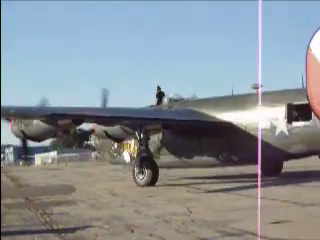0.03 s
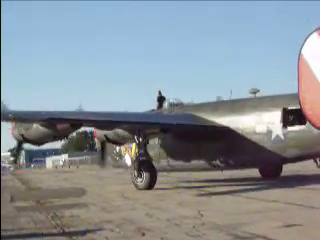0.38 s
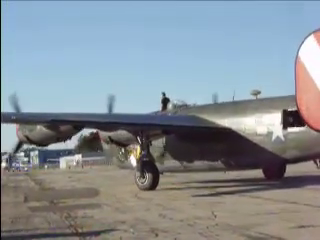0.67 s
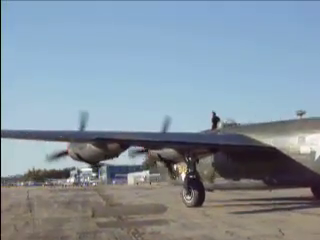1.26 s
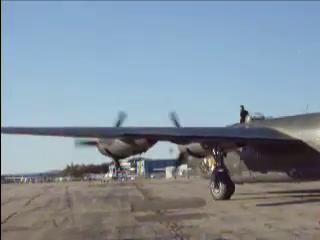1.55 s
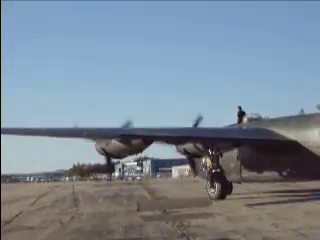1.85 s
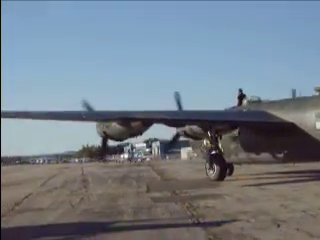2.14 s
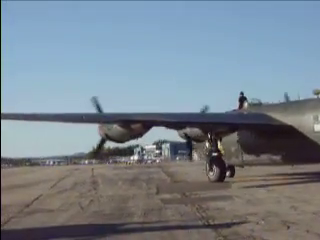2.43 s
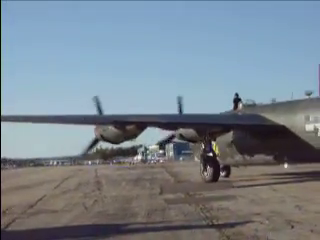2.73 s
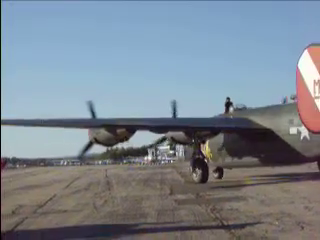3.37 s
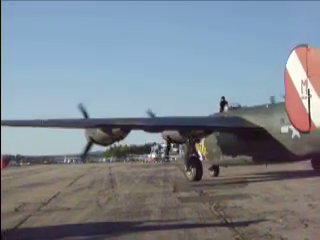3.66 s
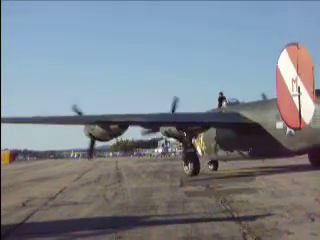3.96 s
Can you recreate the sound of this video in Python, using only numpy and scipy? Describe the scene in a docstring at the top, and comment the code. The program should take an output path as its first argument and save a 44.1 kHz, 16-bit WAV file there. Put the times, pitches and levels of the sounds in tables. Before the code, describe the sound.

Propeller aircraft engines idling with a steady, low, throbbing drone as it taxis.

```python
"""Radial-engined aircraft taxiing

A large piston aircraft taxis slowly away across an open apron. Three radial engines idle at slightly
different speeds, so their exhaust notes beat and throb. Each firing gives an exhaust pop and a burst
of valve clatter; the propellers chop turbulent air. The brakes squeak faintly four times, and the
recorder adds a thin whine."""
import sys
import numpy as np
from scipy import signal
from scipy.fft import rfft, irfft
from scipy.io import wavfile

SR = 44100
rng = np.random.default_rng(int(sys.argv[2]) if len(sys.argv) > 2 else 0)


def to_wav(s):
    """Save 16-bit WAV."""
    ch = np.atleast_2d(s).T  # columns
    pcm = np.round(np.clip(ch, -1, 1) * 32767)  # PCM
    wavfile.write(sys.argv[1], SR, pcm.astype(np.int16))


N = 176400
T = np.arange(N) / SR

# Crankshaft speed of the lead (loudest) engine. Each row: time in seconds, turns per second.
LEAD_SPEED_HZ = [(0, 10.2), (2.5, 10.19), (3.0, 10.09), (3.5, 9.94), (4, 9.87)]
# Lead engine's drone and the next order up. Each row: time in seconds, level in dB.
DRONE_DB = [(0, -25.5), (.65, -29), (1.1, -23.5), (1.55, -25.5), (2.1, -23.5), (3.2, -26.5), (4, -30.5)]
DRONE_ABOVE_DB = [(0, -29), (.7, -32), (1.55, -46), (2.1, -34), (2.5, -38.5), (3.0, -33.5), (3.4, -35),
                  (4, -40)]
# Exhaust tones per engine, swelling and fading as the aircraft turns, then gear tones.
# Each entry: crankshaft order, then peak level in dB, peak time in seconds, fall either side in dB/s.
LEAD_TONES = {5: (-41.5, 3.6, 1), 7: (-36, 0.4, 0.88), 11: (-35.5, 0.99, 1.3), 13: (-39, 0.56, 1),
              14: (-31.5, 4.14, 1.47), 15: (-41, .5, 1), 16: (-32, 3.1, 3), 17: (-37, 4.7, 1.2),
              18: (-34, 0.16, 3.4), 19: (-41, 1.5, 2.4), 21: (-36, .3, 0.44), 24: (-36.5, 0.73, 3.1),
              25: (-39, .6, 1.9), 27: (-36, 0.7, 8.8), 30: (-31.5, 1.83, 31), 31: (-42.5, 2.65, 3.4),
              35: (-44, 1, 1.8), 36: (-43.5, 1.2, 2), 39: (-46.5, 1, 5), 44: (-51, 0.91, 12),
              45: (-42.5, 1.65, 10), 47: (-49, .9, 7.2), 48: (-46, 1.1, 12)}
SECOND_TONES = {3: (-52, .4, 1.5), 4: (-39.5, 1.1, 2.2), 5: (-38, 5.3, 1), 12: (-37, 0.35, 2.6),
                14: (-36.5, 1.7, 2), 19: (-44, 0.18, 1.9), 20: (-39.5, 2.65, 2.6), 21: (-34, 3.86, 6.1),
                25: (-36, 0.62, 4.3), 25.5: (-33, 0.46, 11), 28: (-36, 0.57, 1.6), 30: (-41, 2.4, 0.59),
                33: (-44, 2.6, 0.38)}
THIRD_TONES = {4: (-44, 1.8, 2), 9: (-42.5, 6.8, 0.88), 12: (-47.5, 0.98, 1.2), 14: (-44.5, 0.27, 6.4),
               15: (-46.5, 0.45, 1.9), 19: (-38.5, 3.3, 1), 20: (-47.5, 1.8, 1.6), 21: (-41.5, 1.6, 4.8),
               22: (-48.5, 0.86, 3.7)}
GEAR_TONES = {142: (-81, 0.92, 3.5), 201: (-63, 0.99, 4.3), 208: (-62, 0.8, 5.9), 278: (-79, 2, 0),
              479: (-68, 0.49, 5.1)}
# Exhaust pops, pipe ring, propeller wash, valve clatter. Each row: frequency in Hz, relative gain in dB.
POP_SPECTRUM = [(20, -43.5), (31, -7.5), (50, -7.5), (62, -6), (100, -2.5), (155, 3), (215, -3.5),
                (260, 0.5), (320, -2), (400, -11), (460, -2.5), (580, -13.5), (750, -18.5), (1100, -33.5),
                (1500, -43), (3000, -69.5)]
RING_SPECTRUM = [(250, -44.5), (360, -5), (410, -6.5), (470, 7.5), (520, -2.5), (620, -10.5), (730, -11.5),
                 (1050, -18), (1500, -50.5)]
WASH_SPECTRUM = [(15, 9), (35, -28), (100, -5.5), (250, 3.5), (450, -2.5), (700, -8), (900, -14),
                 (1150, -15), (1450, -21.5), (2100, -20.5), (2800, -29), (5000, -31), (10000, -36.5),
                 (12000, -52.5)]
CLATTER_SPECTRUM = [(300, -36), (1000, -3), (1600, -1.5), (2000, 3), (2400, 5), (2800, -9), (3300, 2),
                    (4000, 3), (4650, 4.5), (5300, -3.5), (7000, -28.5), (10000, -17), (11000, -26),
                    (12000, -48.5)]
# Once-a-turn chug. Each row: time in seconds, swing of the natural log of gain.
CHUG_DEPTH = [(0, 0), (1.15, 0.49), (1.8, 0), (4, 0.01)]
# Bark, the upper band of the pops. Each row: time in seconds, relative gain in dB.
BARK_GAIN_DB = [(0, -7), (.7, 1.5), (1.6, -1), (2.2, -1), (3, -1), (4, -3)]
# Pipe ring, propeller wash, valve clatter. Each row: time in seconds, level in dB.
RING_DB = [(0, -37.5), (.55, -46), (.72, -40), (1.15, -43), (1.6, -38), (2.1, -47), (2.4, -44.5),
           (2.65, -40.5), (3.0, -45.5), (3.45, -45), (3.7, -36.5), (4, -54)]
WASH_DB = [(0, -35), (.4, -34.5), (1.0, -34.5), (1.25, -35.5), (1.63, -35.5), (1.9, -36.5), (2.35, -36),
           (2.62, -36), (2.8, -37), (3.03, -35), (3.35, -36.5), (3.72, -36), (4, -35.5)]
CLATTER_DB = [(0, -55), (.45, -55.5), (.7, -55), (1.1, -55), (1.3, -57.3), (1.55, -55.3), (1.8, -55.5),
              (1.95, -57.3), (2.5, -56.5), (3.25, -59.5), (4, -58.3)]
# Electronic whine. Each row: frequency in Hz, level in dB.
WHINE_TONES = [(4942, -74.5), (9884, -72)]
# Brake squeaks. Each row: start in seconds, length in seconds, pitch in Hz, glide in Hz/s,
# bend in Hz/s^2, level in dB.
BRAKE_SQUEAKS = [(1.28, 0.24, 1095, 320, -400, -55), (1.434, 0.038, 4040, 3, 0, -57.5),
                 (2.33, 0.14, 867, -100, -2, -53), (2.999, 0.22, 1062, -600, 3600, -52)]


def amp(db):
    """Decibels to gain."""
    return 10 ** (np.asarray(db) / 20)


def unit(x):
    """Scale to rms 1."""
    return x / np.sqrt(np.mean(abs(x) ** 2) + 1e-20)


def curve(points):
    """Join (seconds, value) points by straight lines."""
    return np.interp(T, *np.transpose(points))


def colour(x, spectrum):
    """Filter by a (Hz, dB) spectrum with causal phase; rms 1."""
    hz, db = np.transpose(spectrum)
    bin_hz = abs(np.fft.fftfreq(N, 1 / SR))
    log_gain = np.log(amp(np.interp(np.log(bin_hz + 1), np.log(hz + 1), db)))
    response = np.exp(np.conj(signal.hilbert(log_gain)))[:N // 2 + 1]
    return unit(irfft(rfft(x - x.mean()) * response, N))


def drift(rate_hz, size=2000, grid_hz=400):
    """Slow complex noise, rms 1, to waver level and phase."""
    hz = np.fft.fftfreq(size, 1 / grid_hz)
    noise = rng.standard_normal(size) + 1j * rng.standard_normal(size)
    slow = np.fft.ifft(noise / (1 + (hz / rate_hz) ** 2))
    return unit(np.interp(T, np.arange(size) / grid_hz, slow))


def engine_drone(lead, second, order=9, second_db=-38, in_step_s=2.776):
    """Three deep notes from two engines slide in and out of step and throb."""
    lead, second = (turns - np.interp(in_step_s, T, turns) for turns in (lead, second))
    note = np.exp(2j * np.pi * order * lead) * (1 + 0.11 * drift(rate_hz=9.3))
    above = amp(curve(DRONE_ABOVE_DB)) * np.cos(2 * np.pi * (order + 1) * lead)
    neighbour = amp(second_db) * np.cos(2 * np.pi * order * second)
    return amp(curve(DRONE_DB)) * unit(note.real) + np.sqrt(2) * (above + neighbour)


def shaft_tones(turns, table, waver, waver_hz):
    """Wavering exhaust or gear partials locked to a crankshaft."""
    out = np.zeros(N)
    for order, (peak_db, peak_s, fall_db_per_s) in table.items():
        phase = 2 * np.pi * (order * turns + rng.random())
        partial = np.exp(1j * phase) * unit(1 + waver * drift(waver_hz))
        out += amp(peak_db - abs(fall_db_per_s * (T - peak_s))) * partial.real
    return np.sqrt(2) * out


def firings(turns, cylinders=14, size=400, jitter_s=0.0002):
    """One click per cylinder every two turns. Cylinders differ in strength and lag; each firing varies."""
    index = np.arange(size)
    cylinder = index % cylinders
    strength, lag = rng.standard_normal((2, cylinders))
    variation, jitter = rng.standard_normal((2, size))
    at_turns = 2 * (index + rng.random() + 0.251 * lag[cylinder]) / cylinders
    at_s = np.interp(at_turns, turns, T) + jitter_s * jitter
    push = np.exp(0.16 * strength[cylinder]) * (1 + 0.32 * variation)
    heard = (index < cylinders * turns[-1] / 2 - 2) & (at_s > 0) & (at_s < T[-1])
    return unit(np.bincount((at_s[heard] * SR).astype(int), push[heard], N))


def exhaust(trains, lead, scatter_s=0.0072, bark_hz=225, chug_peak_s=1.13):
    """Pops scatter off wing and ground, their bark chugging; pops and rushing gas ring the pipes."""
    echoes = rng.standard_normal((len(trains), 2000)) * np.exp(-T[:2000] / scatter_s)
    scattered = [signal.oaconvolve(train, echo)[:N] for train, echo in zip(trains, echoes)]
    pops = unit(sum(colour(train, POP_SPECTRUM) for train in scattered))
    low = signal.sosfiltfilt(signal.butter(4, bark_hz, fs=SR, output="sos"), pops)
    chug_phase = 2 * np.pi * (lead - np.interp(chug_peak_s, T, lead))
    chug = unit(np.exp(curve(CHUG_DEPTH) * np.cos(chug_phase)))
    bark = amp(curve(BARK_GAIN_DB)) * chug * (pops - low)
    gas = 1.13 * rng.standard_normal(N)
    ring = colour(unit(sum(scattered)) + gas, RING_SPECTRUM)
    return amp(-31.5) * (low + bark) + amp(curve(RING_DB)) * ring


def propeller_wash(shafts, blades_per_turn=1.69, chop_depth=0.19):
    """Turbulent air, chopped by each passing blade."""
    air = np.zeros(N)
    for turns in shafts:
        blade_phase = 2 * np.pi * (blades_per_turn * turns + rng.random())
        air += (1 + chop_depth * np.cos(blade_phase)) * rng.standard_normal(N)
    return amp(curve(WASH_DB)) * colour(air, WASH_SPECTRUM)


def valve_clatter(trains, decay_s=0.0057, bed=0.88):
    """A metallic burst at every firing, over steady exhaust hiss."""
    bursts = unit(signal.lfilter([1], [1, -np.exp(-1 / (decay_s * SR))], sum(trains)))
    hiss = (bed + bursts) * rng.standard_normal(N)
    return amp(curve(CLATTER_DB)) * colour(hiss, CLATTER_SPECTRUM)


def recorder_whine():
    """Two thin, wavering electronic tones an octave apart."""
    out = np.zeros(N)
    for hz, db in WHINE_TONES:
        tone = np.exp(2j * np.pi * hz * T) * unit(1 + 0.15 * drift(rate_hz=14))
        out += np.sqrt(2) * amp(db) * tone.real
    return out


def brakes(roughness=0.34):
    """Short gliding squeaks that swell and fade."""
    out = np.zeros(N)
    for start_s, length_s, hz, glide, bend, db in BRAKE_SQUEAKS:
        age_s = np.clip(T - start_s, 0, length_s)
        pitch_hz = hz + glide * age_s + bend * age_s ** 2
        squeak = np.exp(2j * np.pi * np.cumsum(pitch_hz) / SR) * (1 + roughness * drift(rate_hz=41))
        swell = np.abs(np.sin(np.pi * age_s / length_s)) ** .5
        out += np.sqrt(2) * amp(db) * swell * squeak.real
    return out


def scene(second_hz=9.59, third_hz=8.84):
    """Three idling engines, their propellers and the brakes; mono."""
    lead = np.cumsum(curve(LEAD_SPEED_HZ)) / SR  # crankshaft angle in turns
    second, third = second_hz * T, third_hz * T
    shafts = lead, second, third
    trains = [firings(turns) for turns in shafts]
    notes = sum(shaft_tones(turns, table, waver=0.23, waver_hz=9.3)
                for turns, table in zip(shafts, (LEAD_TONES, SECOND_TONES, THIRD_TONES)))
    gears = shaft_tones(second, GEAR_TONES, waver=2.7, waver_hz=25)
    engines = engine_drone(lead, second) + notes + gears + exhaust(trains, lead)
    return (engines + propeller_wash(shafts) + valve_clatter(trains) + brakes())[None]


def record(dry, cutoff_hz=11900):
    """Add the whine, then band-limit."""
    padded = np.pad(dry + recorder_whine(), ((0, 0), (127, 127)), "reflect", reflect_type="odd")
    lowpass = signal.firwin(255, cutoff_hz, window=("kaiser", 9), fs=SR)
    return signal.oaconvolve(padded, lowpass[None], "valid")


dry = scene()
out = record(dry)
to_wav(out)
```